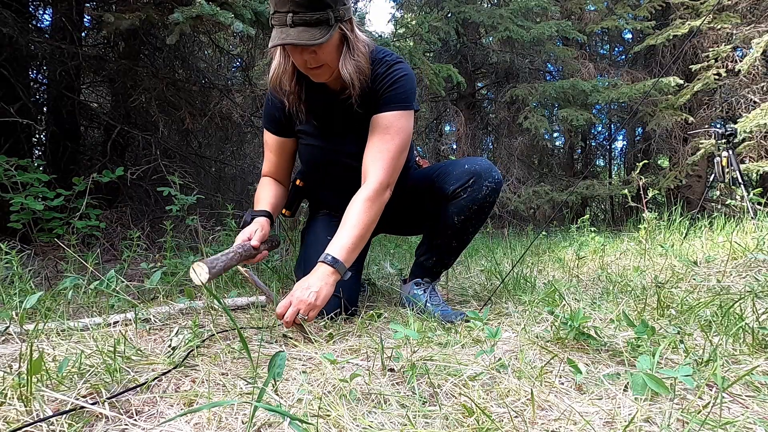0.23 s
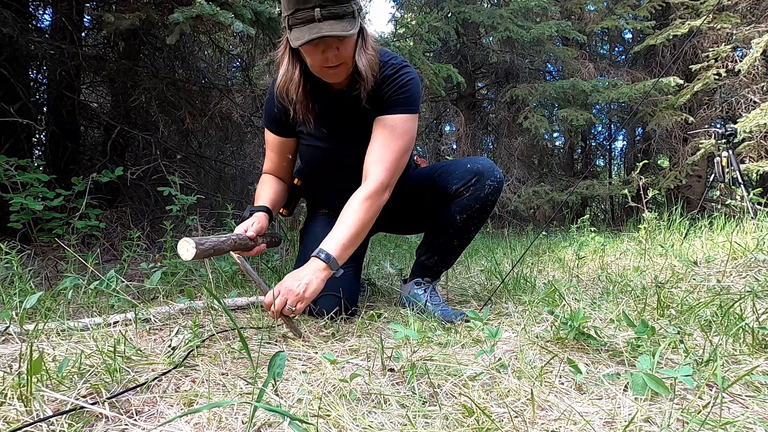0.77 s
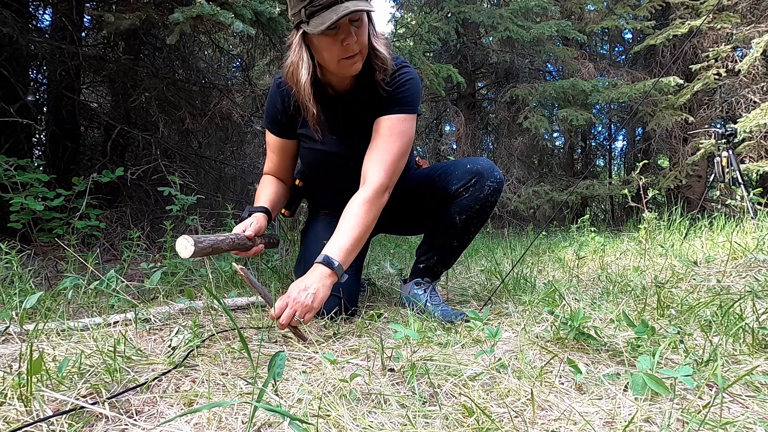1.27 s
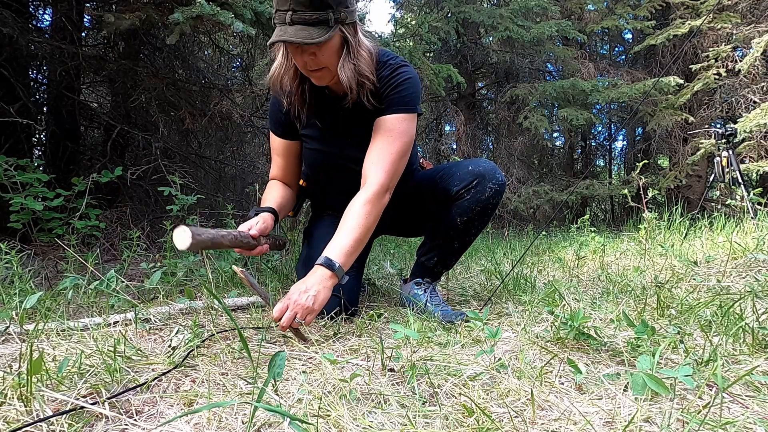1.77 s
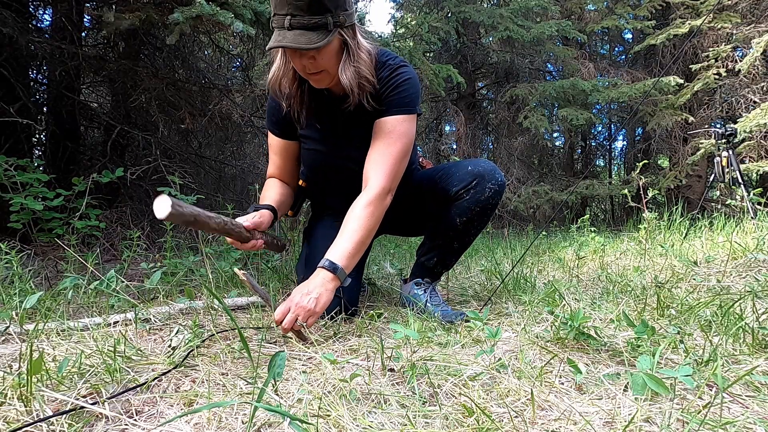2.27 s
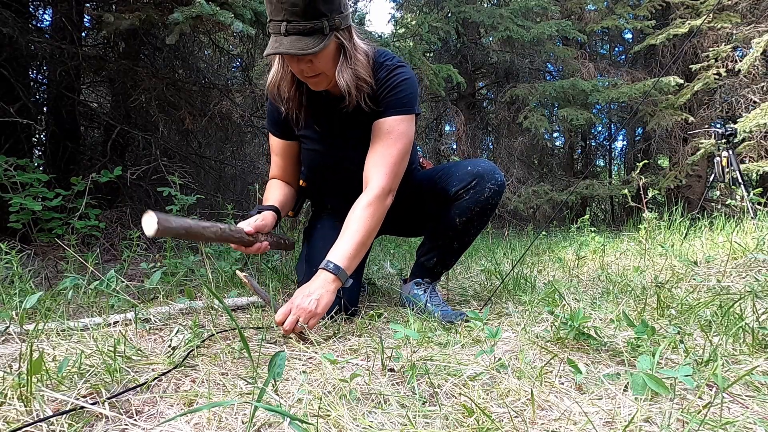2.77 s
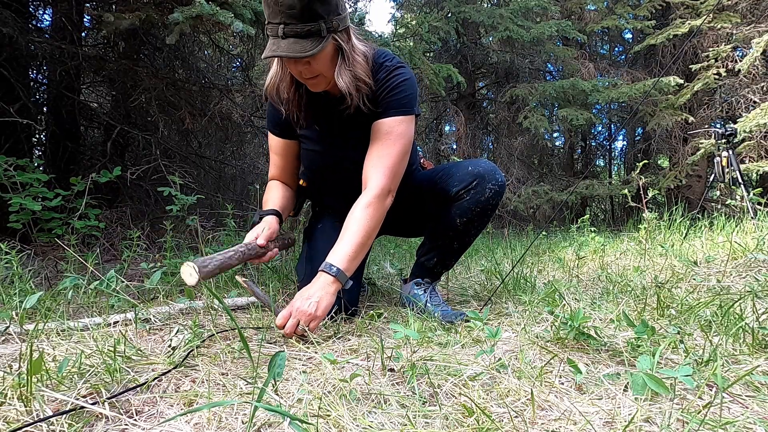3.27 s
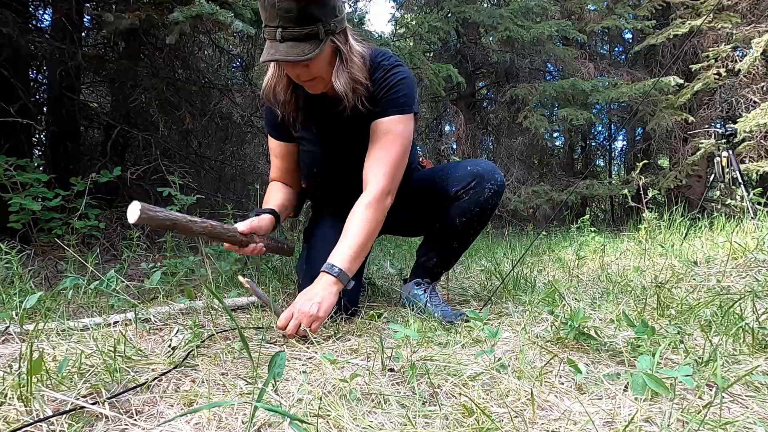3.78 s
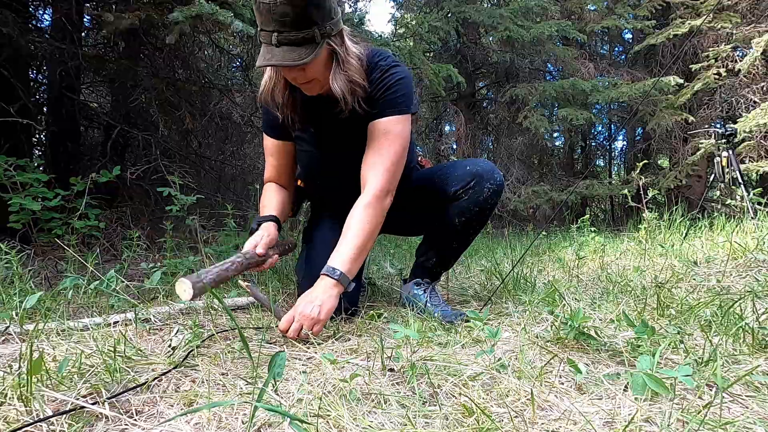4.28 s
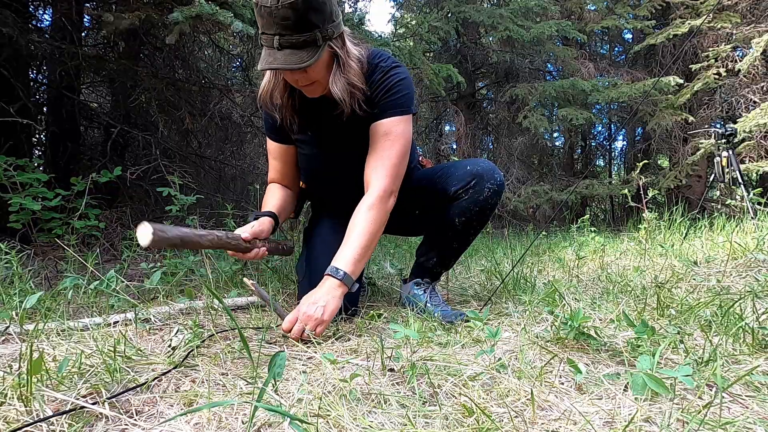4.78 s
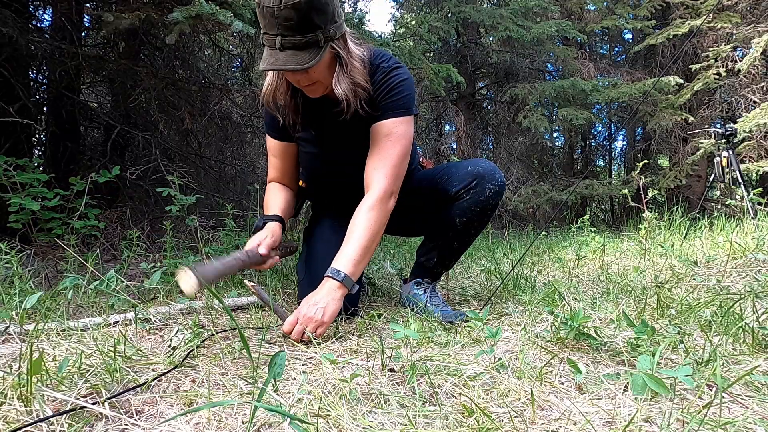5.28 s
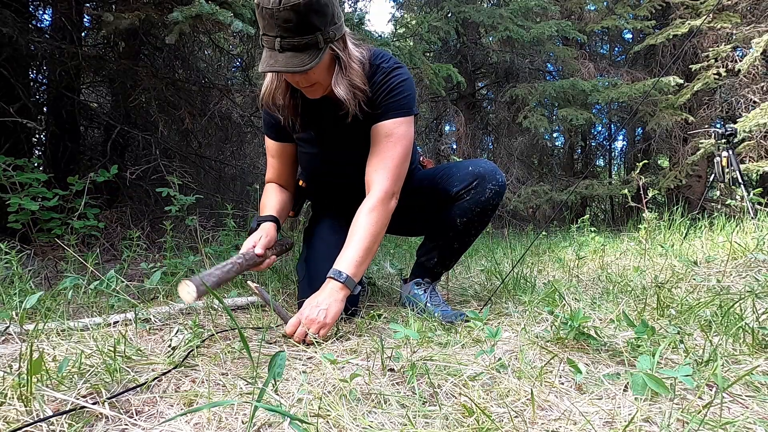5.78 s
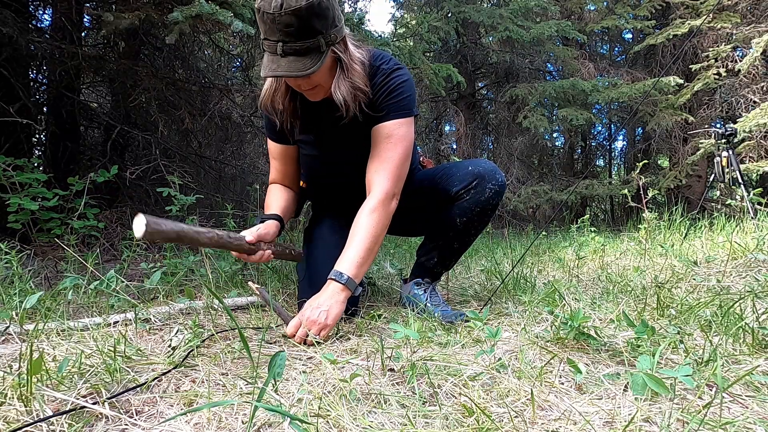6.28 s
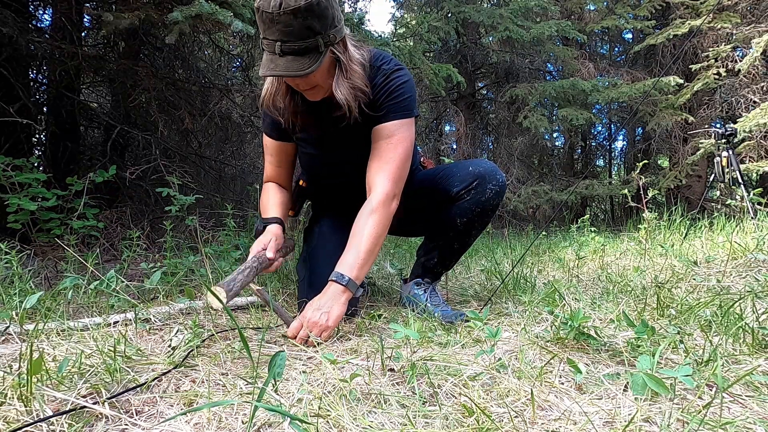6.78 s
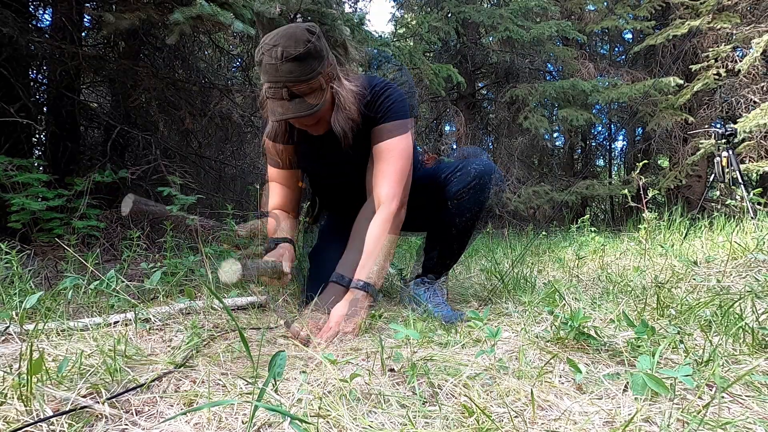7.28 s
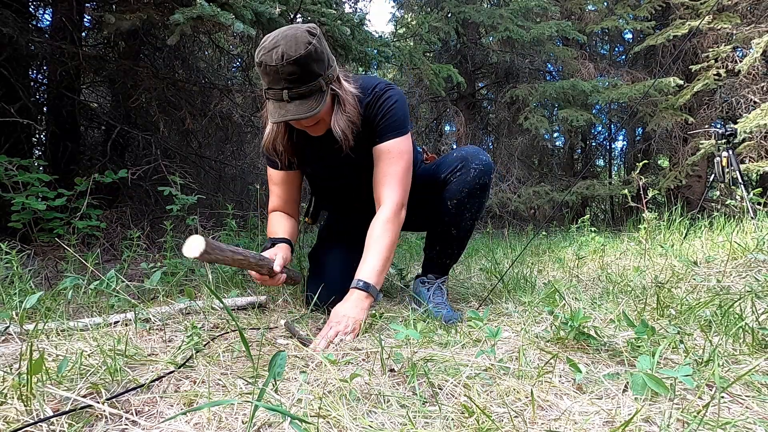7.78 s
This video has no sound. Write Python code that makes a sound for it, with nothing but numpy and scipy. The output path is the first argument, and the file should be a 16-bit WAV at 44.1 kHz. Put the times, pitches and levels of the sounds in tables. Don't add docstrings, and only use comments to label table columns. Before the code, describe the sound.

An open forest clearing with a soft bed of distant traffic and breezy leaf hiss, strongest in the first second or so. A faint wooden touch comes at 0.4 s, then cloth and dry grass brush between 0.65 and 1.1 s with tiny twig snaps; another snap falls at 1.73 s. From 1.9 s a log taps a stake five times, lightly and unevenly. From 3.0 s firm blows follow about every 0.2 s: dry mid-pitched clacks with a sharp crack, brief woody ring and short thud in the soil. Strength and brightness vary; blows near 5.05 and 6.3 s are sharper and glancing. Thuds get heavier after 5.7 s. A weak bounce follows the blow at 6.9 s. From 7.1 s the blows slow slightly, with tighter thuds and a fresh gust, the last at 7.8 s, before a faint rustle at 8 s. Trunks scatter short, quiet echoes; the small nearby microphone has little deep bass.

```python
import sys
import numpy as np
from scipy import signal
from scipy.fft import rfft, irfft
from scipy.io import wavfile
from scipy.ndimage import uniform_filter1d

SR = 44100
rng = np.random.default_rng(int(sys.argv[2]) if len(sys.argv) > 2 else 0)


def store_pcm(level_fs):
    pcm = np.round(np.clip(level_fs, -1, 1) * 32767).astype(np.int16)
    wavfile.write(sys.argv[1], SR, np.atleast_2d(pcm).T)


def ratio(d):
    e = np.asarray(d, float) / 20
    return 10 ** e


N = 353682
T = np.arange(N) / SR
U = np.arange(4410) / SR


def band(x, lo_hz, hi_hz):
    sos = signal.butter(2, [lo_hz, min(hi_hz, .45 * SR)], "bandpass", fs=SR, output="sos")
    y = signal.sosfilt(sos, x)
    return y / np.sqrt(np.mean(y ** 2))


def swell(rise_s, t60_s):
    rise = 1 - np.exp(-(U / rise_s) ** 2)
    shape = rise * np.exp(-np.log(1000) * U / t60_s)
    return shape / shape.max()


def tone(hz, rise_s, t60_s):
    return swell(rise_s, t60_s) * np.sin(2 * np.pi * hz * U)


def burst(hz, length_s, skew):
    progress = np.clip(U / length_s, 0, 1) ** skew
    return np.sin(np.pi * progress) ** 2.77 * np.sin(2 * np.pi * hz * U)


def splinter(noise, lo_hz, hi_hz, rise_s, t60_s):
    shape = swell(rise_s, t60_s)
    click = 9.0 * (shape == 1)
    y = band(band(shape * (noise + click), lo_hz, hi_hz), lo_hz, hi_hz)
    return y / np.abs(y).max()


def walk(rate_hz):
    hold = int(SR / rate_hz)
    steps = np.repeat(rng.standard_normal(N // hold + 1), hold)
    return 1.3 * uniform_filter1d(uniform_filter1d(steps, hold), hold)[:N]


def stage(table, s):
    return [row[1:] for row in table if row[0] <= s][-1]


def add(out, s, db, sound):
    i = int(s * SR)
    n = min(len(sound), N - i)
    out[i:i + n] += ratio(db) * sound[:n]


# start in seconds, then low clack, high clack, crack and thud levels in dB.
TAPS = [
    (0.3994, -24, -32, -32.5, -29),
    (1.891, -19, -17, -27.5, -26.5),
    (2.1141, -24, -24, -25.5, -19),
    (2.333, -14.5, -12.5, -24, -17.5),
    (2.5622, -17, -25, -26.5, -17.5),
    (2.7829, -14.5, -12, -22.5, -20),
    (6.9493, -46, -47, -52, -27.5),
]
# start in seconds, then low clack, high clack, crack and thud levels in dB.
BLOWS = [(2.9953, -10.5, -11.5, -24.5, -25), (3.212, -13, -15.5, -27, -20.5), (3.4163, -15, -18, -30, -21),
         (3.6182, -10.5, -15.5, -23, -20), (3.8314, -10, -11, -27, -19.5), (4.0274, -10.5, -10, -22.5, -20),
         (4.2284, -11.5, -17, -25, -18.5), (4.4304, -11.5, -12, -22.5, -17.5),
         (4.6316, -14.5, -15, -23.5, -18.5), (4.8372, -13, -11.5, -23.5, -15.5),
         (5.048, -30, -9, -12.5, -13.5), (5.2578, -12.5, -13, -20.5, -15),
         (5.4679, -9.5, -10.5, -23.5, -17), (5.6794, -11, -17, -28, -14), (5.885, -10.5, -14.5, -27, -12.5),
         (6.0892, -14, -14.5, -21.5, -10.5), (6.2954, -31, -10, -21.5, -11.5),
         (6.4978, -13.5, -14, -23.5, -11), (6.6987, -12.5, -12.5, -26.5, -11.5),
         (6.9032, -12, -13, -23.5, -10.5), (7.1102, -11.5, -11, -14.5, -11),
         (7.3349, -13.5, -11.5, -16, -10), (7.5664, -18, -12.5, -22, -9), (7.7971, -17, -14, -19, -9)]
HITS = TAPS + BLOWS
OFF_CENTRE = {0: (-9, -120), 1: (-1.6, 10), 2: (-2, 0), 5: (1.3, 10), 10: (1.4, -87), 14: (-1.5, -15),
              15: (-2, 62), 19: (-1.4, 25), 22: (2.3, -7), 25: (-1.5, -7), 27: (2.5, -30), 3: (3.3, 0),
              4: (4.4, 110), 7: (-5, 95), 8: (2.2, 75), 9: (-16, 40), 12: (4.1, -34), 16: (4.5, -56),
              17: (-13, 0), 20: (-5, -100), 23: (.1, 60), 24: (-2, 230), 26: (13, 0), 28: (-6, 40),
              29: (-11, 0), 30: (19.4, -36)}
# start in seconds, contact length in seconds, jolt in Hz,
# after-shake in Hz, its delay in seconds, its length in seconds.
DEPTH = [
    (0, 0.0059, 404, 184, 0.01, 0.023),
    (2.9, 0.0046, 408, 144, .011, 0.041),
    (4.75, 0.0039, 375, 144.6, 0.0112, 0.039),
    (7.2, 0.0051, 441, 173, 0.024, 0.059),
]
# start in seconds,
# lower ring in dB, its t60 in seconds, upper ring in dB, its t60 in seconds.
RING = [
    (0, -3.5, 0.027, 1, 0.043),
    (7.2, 4.5, 0.039, -3, 0.011),
]
RING_HZ = (682, 797)
LOW_START_HZ, LOW_END_HZ, CLIMB_FROM_S, CLIMB_S = 1120, 1312, 2.33, 0.77
HIGH_HZ, GLANCE_HZ_PER_DB, FORCE_HZ_PER_DB = 1685, 4.0, 15.5
CLACK_SCATTER = .006
RING_DB, RING_SHORTFALL_DB, RING_OVER_CLACK_DB = -21, 6.5, -4
GLANCE_FROM_DB, GLANCE_LONGER_PER_DB, GLANCE_SHARPER_HZ_PER_DB, GLANCE_RING_LOSS = 4.5, 0.03, 8, 0.2


def wood():
    out = np.zeros(N)
    noises = rng.standard_normal((len(HITS), len(U)))
    for k, ((s, low_db, high_db, _, _), noise) in enumerate(zip(HITS, noises)):
        lower_db, lower_t60, upper_db, upper_t60 = stage(RING, s)
        touch_s = stage(DEPTH, s)[0]
        loose = np.exp(-max(s - CLIMB_FROM_S, 0) / CLIMB_S)
        clack_db = max(low_db, high_db)
        glance_db = max(high_db - low_db - GLANCE_FROM_DB, 0)

        low_hz = LOW_END_HZ + (LOW_START_HZ - LOW_END_HZ) * loose
        low_hz += GLANCE_HZ_PER_DB * (high_db - low_db) + FORCE_HZ_PER_DB * (clack_db + 13)
        low_hz *= 1 + CLACK_SCATTER * noise[0]
        high_hz = HIGH_HZ + GLANCE_SHARPER_HZ_PER_DB * glance_db + OFF_CENTRE.get(k, (0, 0))[1]
        high_hz *= 1 + CLACK_SCATTER * noise[1]
        high_s = (0.88 + GLANCE_LONGER_PER_DB * glance_db) * touch_s
        add(out, s - .0004, low_db, -burst(low_hz, touch_s, 1.15))
        add(out, s - .0004, high_db, burst(high_hz, high_s, 1.15))
        rough = band(noise, 0.68 * high_hz, 1.246 * high_hz)
        add(out, s, high_db - 12.0, swell(0.0023, 0.016) * rough)

        ring_db = RING_DB - RING_SHORTFALL_DB * loose ** 2 - GLANCE_RING_LOSS * glance_db
        ring_db = min(ring_db, clack_db + RING_OVER_CLACK_DB)
        add(out, s, ring_db - 13, swell(.002, 0.033) * band(noise[::-1], 620, 930))
        add(out, s + 0.00062, ring_db + lower_db, -tone(RING_HZ[0], 0.00078, lower_t60))
        add(out, s + 0.00057, ring_db + upper_db, tone(RING_HZ[1], 0.0018, upper_t60))
    return out


SNAP_DB, THIRD_DB, THIRD_FADE_DB_PER_S, FOURTH_DB = -9.5, -5.5, 5, -2.5
HISS_DB, HISS_SLOPE, OVERTONE_SCATTER_DB = -18.5, .6, 1.5


def contact():
    out = np.zeros(N)
    grit = rng.standard_normal((len(HITS), 4, len(U)))
    for k, ((s, low_db, high_db, crack_db, _), noise) in enumerate(zip(HITS, grit)):
        luck_db = OVERTONE_SCATTER_DB * noise[3]
        snap_db = min(low_db, high_db + 8.5) + SNAP_DB + luck_db[0]
        third_db = high_db + THIRD_DB - THIRD_FADE_DB_PER_S * max(s - CLIMB_FROM_S, 0)
        third_db += OFF_CENTRE.get(k, (0, 0))[0]
        add(out, s - .0002, snap_db, burst(2085, 0.0015, 0.67))
        add(out, s, third_db, burst(3076, 0.0049, 0.88))
        add(out, s, crack_db + FOURTH_DB + luck_db[2] - 7.0, tone(4350, 0.00099, 0.0081))

        hiss_db = HISS_DB + HISS_SLOPE * crack_db
        add(out, s - .0004, crack_db + 0.9, splinter(noise[0], 2230, 6280, 0.00014, 0.018))
        add(out, s - .0004, min(hiss_db, crack_db), splinter(noise[1], 4530, 11540, 0.0006, 0.007))

        clumps_db = 5.0 * np.repeat(noise[3], 60)[:len(U)]
        crumbs = band(noise[2] * ratio(clumps_db), 1600, 7100)
        add(out, s, min(0.33 * hiss_db - 38.5, crack_db - 14), swell(0.003, 0.075) * crumbs)
    return out


# start in seconds, thud in Hz, thud length in seconds,
# jolt level in dB, after-shake over thud in dB.
TURF = [
    (0, 255, 0.013, -11.5, -16),
    (1.5, 207, 0.015, -8.5, -17),
    (2.0, 235, .011, -6.5, -22.5),
    (2.9, 156, 0.014, -7.5, -19),
    (4.1, 158, 0.017, -7, -19),
    (4.75, 169, 0.018, -9, -21.5),
    (5.8, 178.4, 0.018, -7.5, -22),
    (7.2, 222.4, 0.02, -8, -30.5),
]
JOLT_PER_THUD, JOLT_PER_CLACK = 0.46, 0.23


def soil():
    out = np.zeros(N)
    noises = rng.standard_normal((len(HITS), len(U)))
    for (s, low_db, high_db, _, thud_db), noise in zip(HITS, noises):
        _, jolt_hz, shake_hz, wait_s, shake_s = stage(DEPTH, s)
        thud_hz, length_s, jolt_db, shake_db = stage(TURF, s)
        add(out, s - .0002, thud_db, -burst(thud_hz, length_s, 0.52))
        jolt_db += JOLT_PER_THUD * thud_db + JOLT_PER_CLACK * max(low_db, high_db)
        add(out, s, jolt_db, -burst(jolt_hz, 0.0065, 0.92))
        rumble = band(noise, 0.54 * shake_hz, 1.4 * shake_hz)
        shake = np.sin(2 * np.pi * shake_hz * U) + 0.72 * rumble
        shake *= swell(0.00067, 0.21) * np.exp(-(U / shake_s) ** 4)
        add(out, s + wait_s, thud_db + shake_db + 1, shake)
    return signal.sosfilt(signal.butter(2, 62, "highpass", fs=SR, output="sos"), out)


# delay in seconds, level in dB.
TRUNKS = [
    (.022, -31),
    (.031, -42),
    (.047, -38.5),
    (.062, -38.5),
]
WOODS_T60_S, WOODS_DB, SWAY_S = 0.36, -22.5, .4


def woods(x):
    t = T[:SR // 2]
    out = np.zeros(N)
    fade = np.exp(-np.log(1000) * t / WOODS_T60_S) * (1 - np.exp(-(t / 0.012) ** 2))
    for s in np.arange(0, T[-1] + SWAY_S, SWAY_S):
        scatter = band(rng.standard_normal(len(t)), 1320, 7600)
        echo = ratio(WOODS_DB) / np.sqrt(SR * 0.069) * scatter * fade
        for late_s, db in TRUNKS:
            echo[int(late_s * SR)] += ratio(db)
        near = slice(max(int((s - SWAY_S) * SR), 0), int((s + SWAY_S) * SR))
        share = np.clip(1 - np.abs(T[near] - s) / SWAY_S, 0, 1)
        add(out, near.start / SR + 1e-6, 0, signal.fftconvolve(x[near] * share, echo))
    return out


# peak in seconds, level in dB, length in seconds.
RUSTLE = [
    (.756, -60, .06),
    (.882, -51, 0.17),
    (1.01, -53, .08),
    (1.46, -77, .1),
    (1.734, -74, .03),
    (7.85, -62, .04),
    (7.998, -53, .02),
]
# start in seconds, level in dB, centre in Hz.
TWIGS = [
    (0.647, -60, 1980),
    (1.0154, -53, 1530),
    (1.3685, -64, 1730),
    (1.733, -52, 1510),
    (7.9894, -63, 1700),
]
# middle in seconds, level in dB, half length in seconds.
LEAVES = (4.9, -59.5, 0.14)
RUSTLE_ATTACK, RUSTLE_FALL_DB = .55, 21


def rustle():
    grains = band(rng.standard_normal(N) * ratio(3.5 * rng.exponential(size=N)), 3200, 8900)
    moves = np.zeros(N)
    for s, db, length_s in RUSTLE:
        away = np.maximum((T - s) / length_s, (s - T) / length_s / RUSTLE_ATTACK)
        moves += ratio(db - 10 - RUSTLE_FALL_DB * away)
    s, db, half_s = LEAVES
    stir = ratio(db) * np.exp(-((T - s) / half_s) ** 4)
    out = moves * grains + stir * band(rng.standard_normal(N), 2200, 3100)
    for s, db, hz in TWIGS:
        snap = band(rng.standard_normal(len(U)), 0.45 * hz, 2.0 * hz)
        add(out, s, db + 7.5, swell(0.00065, 0.017) * snap)
    return out


# frequency in Hz, level in dB per Hz.
AIR = [(28, -25), (60, -2), (125, -5), (185, 0), (240, -3.5), (310, -10.5), (550, -11.5), (1150, -4.5),
       (2000, -10), (4400, -15.5), (6800, -22), (8200, -30), (11500, -35), (14200, -42)]
# time in seconds, level in dB.
WIND = [
    (0, 5.5),
    (1.0, 6),
    (2.0, 1),
    (3.5, -4.5),
    (4.3, -2.5),
    (5.0, -2.5),
    (7.0, -3.5),
    (7.4, 2),
    (8.02, 1.5),
]
# level in dB, share of the wind in dB per dB, flicker in dB.
PARTS = [
    (-63.5, -0.74, -0.5),
    (-56.5, 0.42, 2.1),
    (-55.5, 0.092, 0.15),
    (-67.5, 1.04, 0.3),
]


def background():
    hz = np.maximum(np.fft.rfftfreq(N, 1 / SR), 1)
    air_hz, air_db = np.transpose(AIR)
    colour = ratio(np.interp(np.log(hz), np.log(air_hz), air_db))
    below = [1 / (1 + (hz / edge_hz) ** 4) for edge_hz in (125, 480, 3000)]
    shares = np.diff([0 * hz, *below, 1 + 0 * hz], axis=0)
    wind_db = np.interp(T, *np.transpose(WIND))
    out = np.zeros(N)
    for share, (db, follow, flicker_db) in zip(shares, PARTS):
        spectrum = rfft(rng.standard_normal(N)) * colour * np.sqrt(np.clip(share, 0, 1))
        part = irfft(spectrum, N)
        out += part / part.std() * ratio(db + follow * wind_db + flicker_db * walk(6.2))
    return out


def scene():
    blows = wood() + contact()
    return (blows + woods(blows) + soil() + rustle() + background())[None]


def band_limit(x):
    return signal.sosfilt(signal.butter(12, 14130, fs=SR, output="sos"), x)


def record(dry):
    bass_cut = signal.butter(2, 40, "highpass", fs=SR, output="sos")
    top_cut = signal.butter(6, 12500, fs=SR, output="sos")
    early = np.roll(dry, -int(0.0106 * SR), axis=1)
    heard = dry + ratio(-32) * early
    mix = signal.sosfilt(np.vstack([bass_cut, top_cut]), heard)
    return band_limit(mix)


dry = scene()
out = record(dry)
store_pcm(out)
```